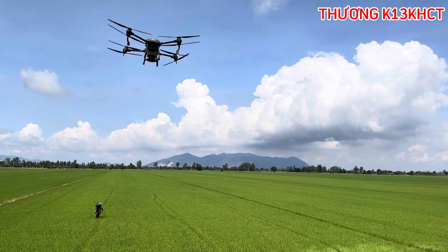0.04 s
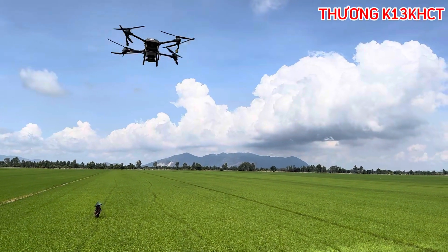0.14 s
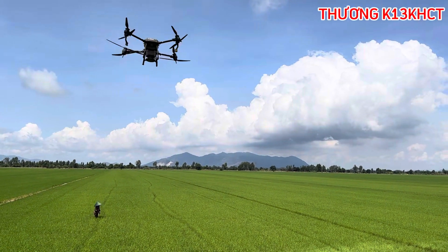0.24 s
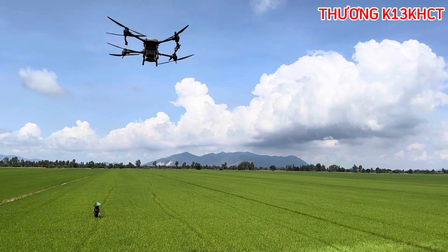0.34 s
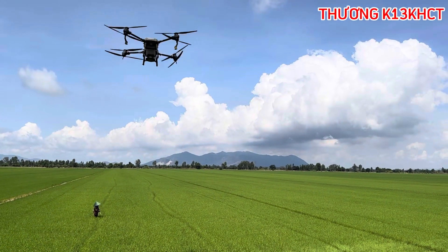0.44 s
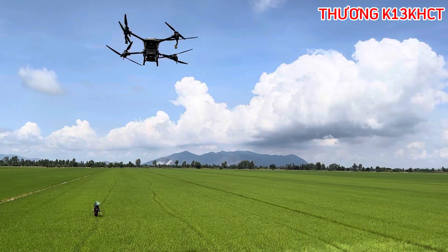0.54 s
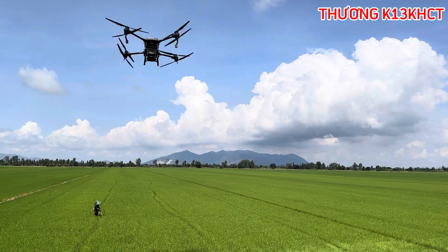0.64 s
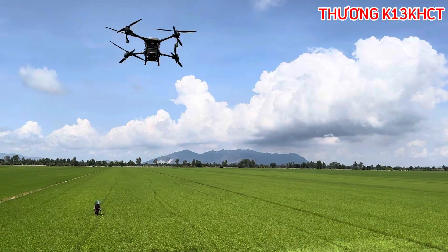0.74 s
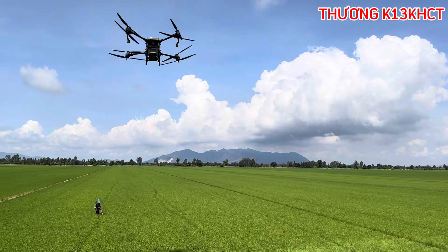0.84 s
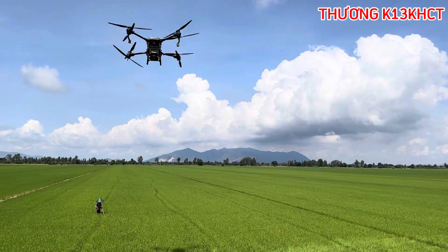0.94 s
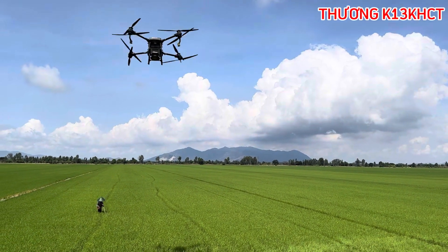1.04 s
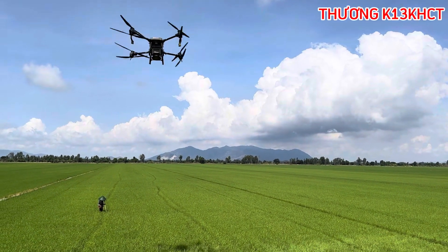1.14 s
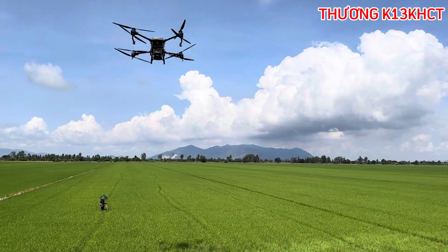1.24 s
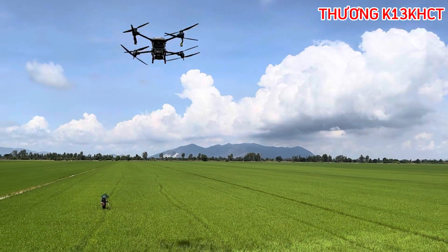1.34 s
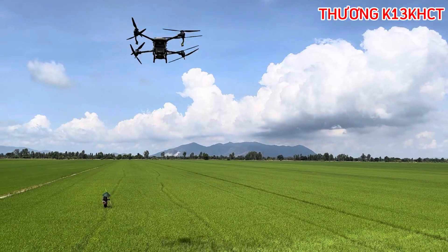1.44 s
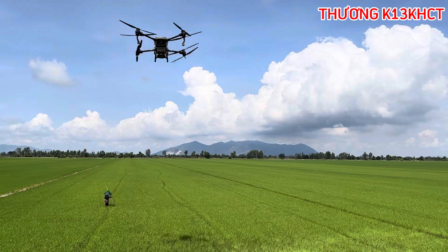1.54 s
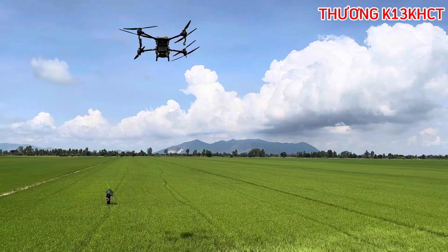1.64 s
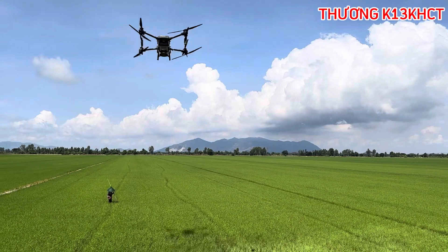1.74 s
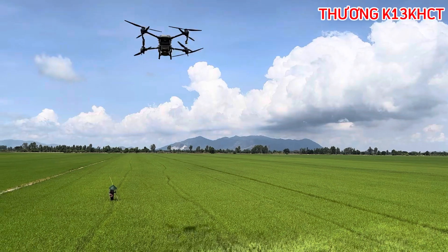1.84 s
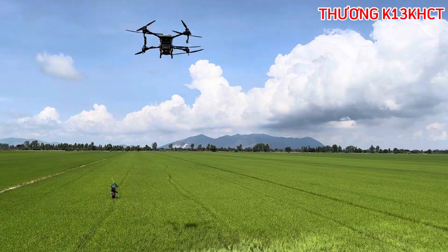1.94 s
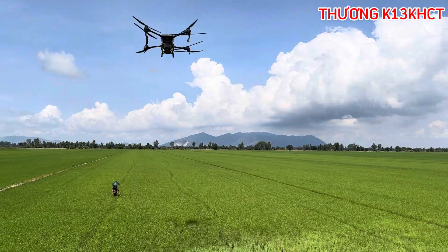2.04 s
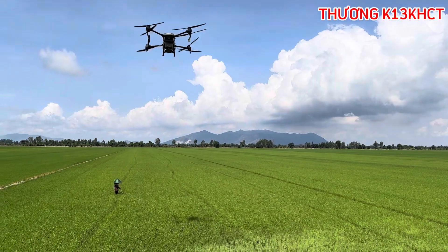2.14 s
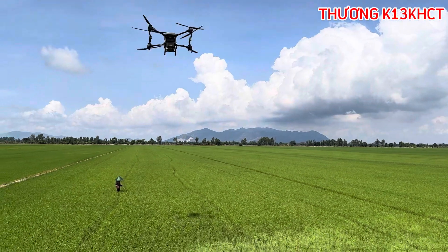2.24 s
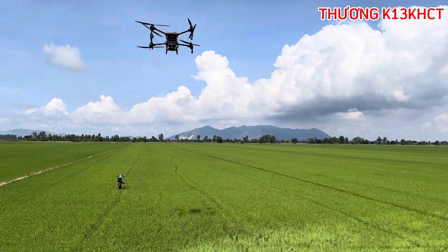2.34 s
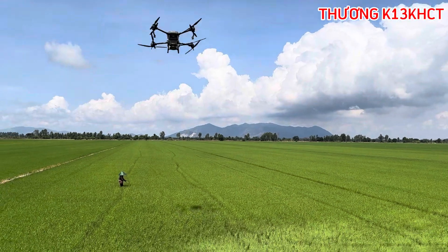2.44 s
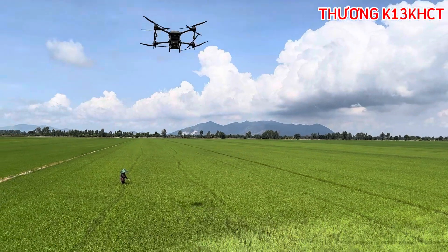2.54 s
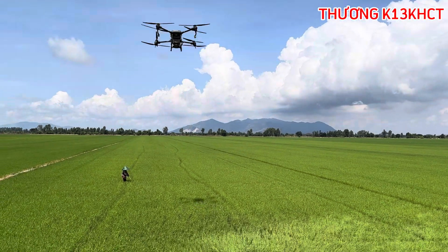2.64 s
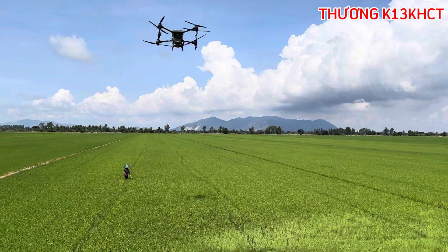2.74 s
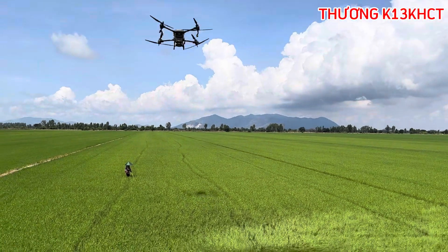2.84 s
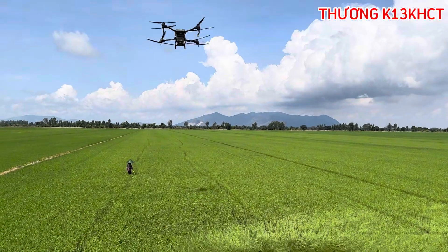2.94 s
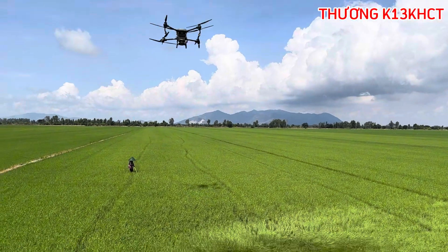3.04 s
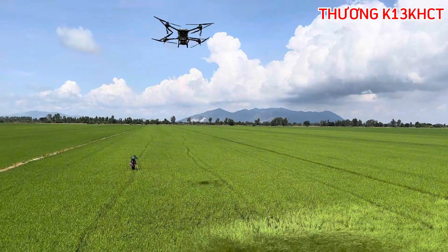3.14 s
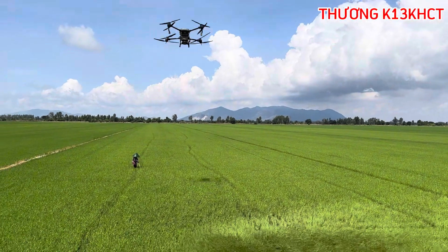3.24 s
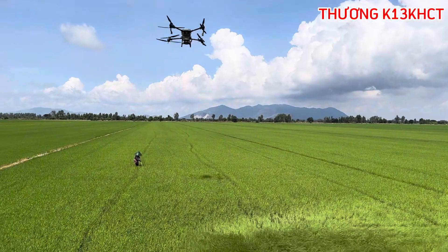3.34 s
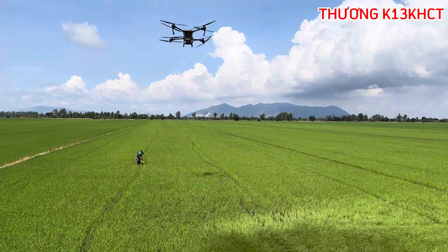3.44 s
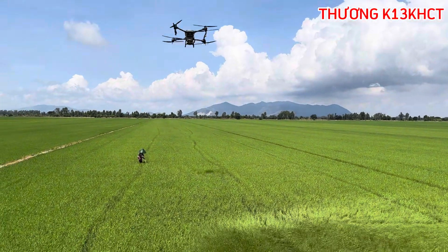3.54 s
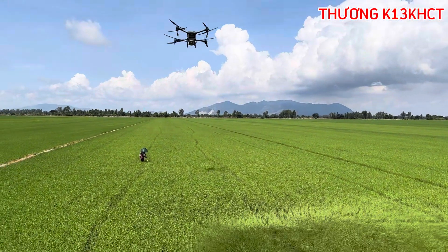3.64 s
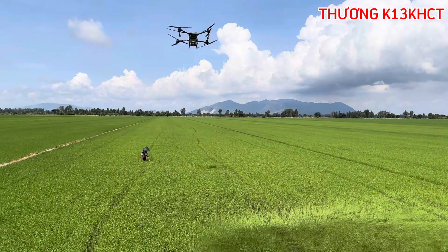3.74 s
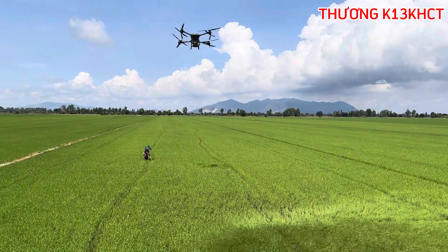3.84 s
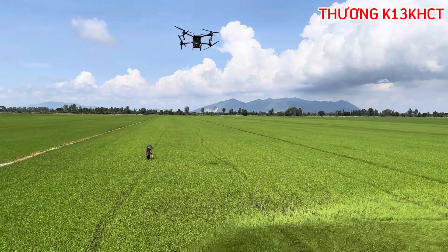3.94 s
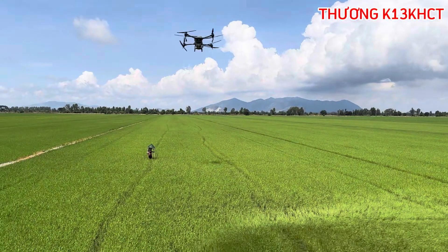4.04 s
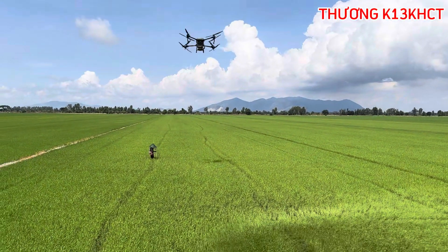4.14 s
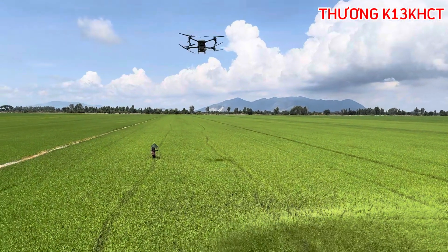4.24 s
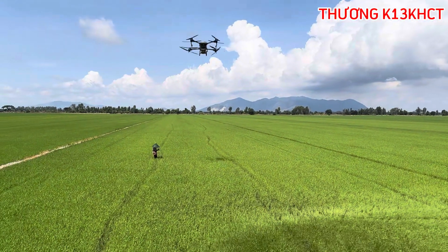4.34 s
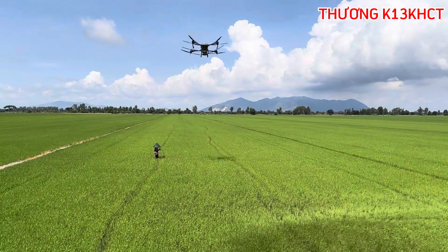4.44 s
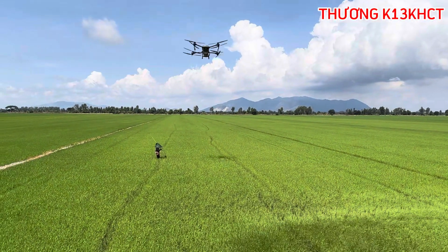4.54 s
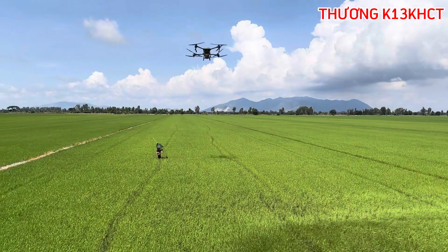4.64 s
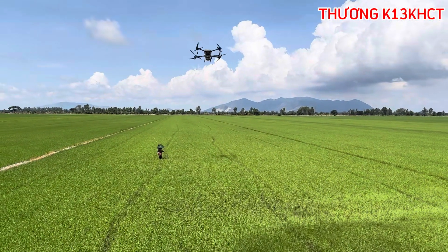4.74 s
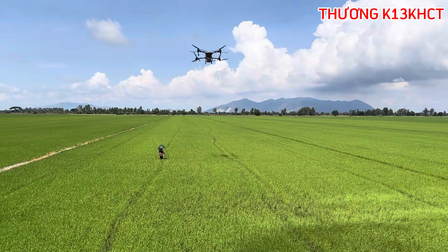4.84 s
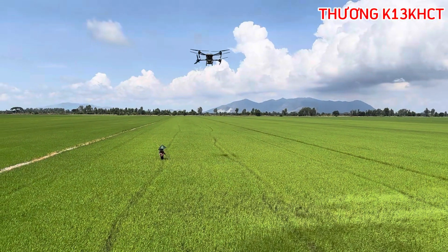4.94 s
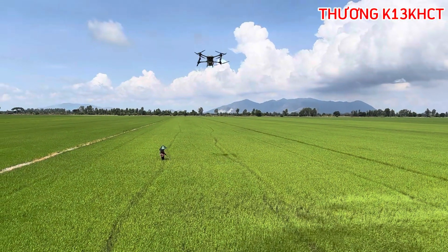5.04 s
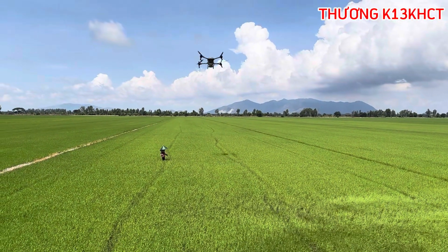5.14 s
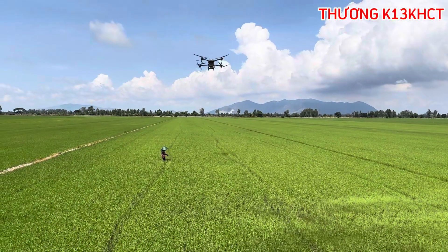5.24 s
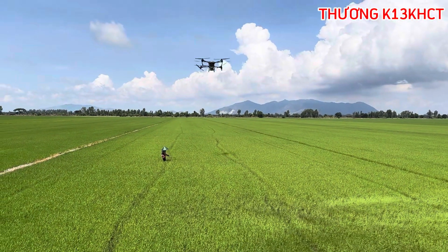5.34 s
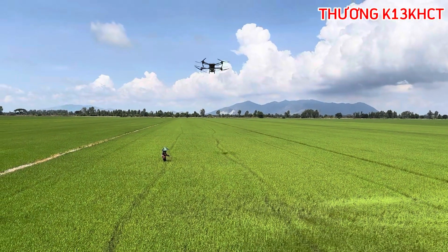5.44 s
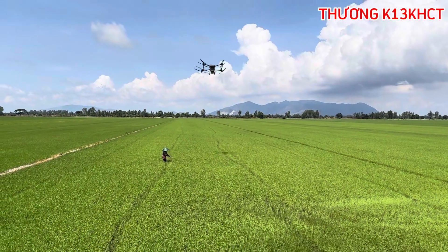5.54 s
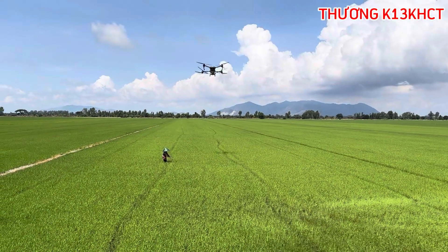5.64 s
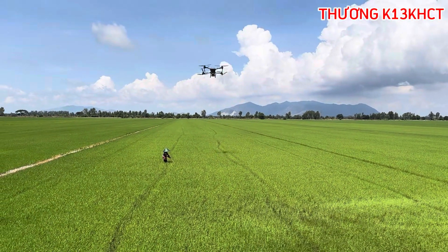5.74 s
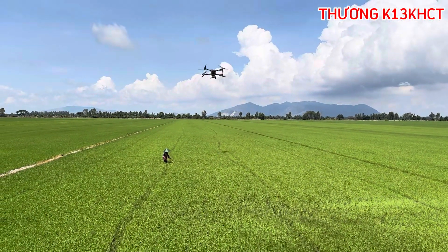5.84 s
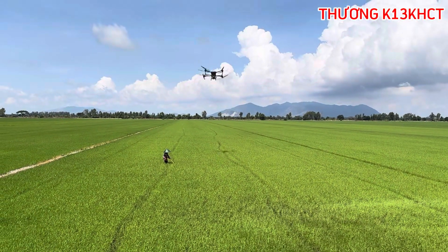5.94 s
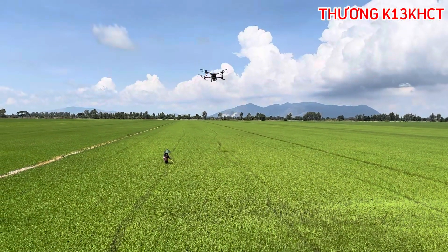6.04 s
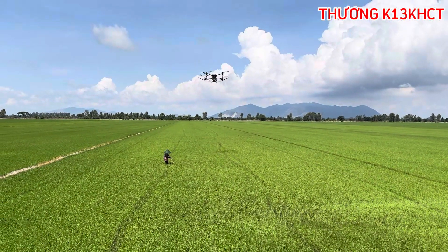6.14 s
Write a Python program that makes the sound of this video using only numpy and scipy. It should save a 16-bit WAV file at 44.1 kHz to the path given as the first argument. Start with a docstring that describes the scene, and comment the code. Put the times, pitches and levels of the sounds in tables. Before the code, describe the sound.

A large four-rotor spraying drone buzzes and whooshes overhead, then recedes across an open field, with hissing mist, a steady engine hum and wind rumble.

```python
"""Spraying drone over a rice field

A four-rotor drone flies low over a flooded field and draws away: each rotor hums at its own speed,
and its blades chop a rush of air. The field sends back a late copy that sweeps the colour.
Spray hisses in step with the rotors, and a faint ringing sizzle flares up once.
A small engine (likely a generator) runs steadily nearby, and gusts rumble on the microphone."""
import sys
import numpy as np
from scipy import signal
from scipy.fft import rfft, irfft, next_fast_len
from scipy.io import wavfile
from scipy.ndimage import uniform_filter1d, map_coordinates

SR = 44100
rng = np.random.default_rng(int(sys.argv[2]) if len(sys.argv) > 2 else 0)


def persist_wave(psi):
    """Save psi, clipped to +-1, as 16-bit WAV."""
    counts = np.round(np.clip(psi, -1, 1) * 32767).astype(np.int16)
    wavfile.write(sys.argv[1], SR, np.atleast_2d(counts).T)


N = 272979
T = np.arange(N) / SR  # time of each sample [s]

# share of each rotor in the overtones and the chopping: (level [dB]), one entry per rotor
ROTOR_DB = [-4, -9, -7, -11.5]
# colour of the air rushing over the blades: (frequency [Hz], level [dB per Hz])
RUSH = [(40, -19), (110, 7.5), (210, 0.5), (270, -10), (330, 1.5), (430, -1), (620, 2), (1000, -0.5),
        (1450, -0.5), (1750, -4.5), (2400, -7.5), (4000, -13), (7000, -21), (10000, -73)]
# centres of the bands that flicker separately in the rush: (frequency [Hz])
RUSH_BANDS_HZ = [125, 250, 500, 1000, 2000, 4000, 8000]
# gusts in the rotor wash, before their own colour: (time [s], length [s], louder by [dB])
WASH_GUSTS = [(0.58, 0.078, 4), (0.96, 0.058, 1), (1.14, 0.022, 3), (1.95, 0.034, 3), (3.82, 0.025, 4),
              (4.85, 0.025, 3.5), (5.035, 0.024, 2)]
# hiss off the back edges of the blades: (frequency [Hz], level against the rush [dB])
EDGE_HISS = [(700, -40), (1600, -18), (2600, -14.5), (3800, -15), (7000, -34)]
EDGE_BEAM = 5.4  # a higher power makes the downward beam narrower


def drone(turns, rush_db, chop=0.3, sharp=6.8, lopsided=0.28):
    """Rotor tones and air noise that pulses with each blade, heard directly and off the field."""
    weights = np.sqrt(undb(ROTOR_DB))
    blades = np.average([swish(2 * turn, sharp) for turn in turns], axis=0, weights=weights)
    # the two blades of a rotor differ, so the rush also throbs once a turn
    power = (1 - chop + chop * blades) * swish(turns[0], lopsided)
    rush = eddies(air(RUSH), RUSH_BANDS_HZ, depth_db=1.75, rate=30)
    rush = rush * np.sqrt(power) * undb(rush_db)
    # gusts swell the middle of the rush
    gust_colour = [(200, -28), (450, -2.5), (1500, -5.5), (3000, -15)]
    gusts = colour(rush, gust_colour) * (undb(louder_db(WASH_GUSTS)) - 1)
    edge = colour(rush, EDGE_HISS) * (1 - glancing()) ** EDGE_BEAM
    direct = rush + gusts + edge + rotor_tones(turns, rush_db) + imbalance_throb(turns[0])
    return direct + field_echo(direct)


# how often blades pass on each rotor; the rates start far apart and draw closer as the drone leaves:
# (time [s], rotor 1 [Hz], rotor 2 [Hz], rotor 3 [Hz], rotor 4 [Hz])
ROTOR_HZ = [(0, 95.1, 106.5, 77.8, 95.3), (0.349, 94.76, 103.8, 81.4, 93.7), (0.7, 94.2, 107.5, 85.2, 94.4),
            (1.0, 94.9, 108, 84, 95.83), (1.3, 95.87, 103.9, 83.18, 93.97), (1.75, 95.4, 97.5, 81.35, 93.4),
            (2.7, 94.95, 96.65, 80, 92), (3.5, 93.8, 94.6, 79.57, 92.1), (4.2, 94, 93.5, 81.74, 92.3),
            (6.19, 93.97, 95.5, 81.44, 93)]


def shafts(wobble=0.003056):
    """Turns made by each two-bladed rotor: half its blade rate, with a small random wobble."""
    return [rng.random() + np.cumsum(hz / 2 * (1 + wobble * walk(7))) / SR for hz in curves(ROTOR_HZ)]


# curve of overtone strength against the rush, read at each whole multiple from 4 to 24:
# (multiple of the shaft rate, level for the loudest rotor [dB], level for the other three [dB])
ROTOR_TONES = [(3.95, -4, -4), (5, -15, -15.5), (6, -10, -12), (7, -12.5, -14.5), (8, -12, -13.5),
               (9, -11.5, -15), (10, -11, -18.5), (11, -13, -19), (12, -11, -15.5), (13, -12, -30),
               (14, -21, -18), (15, -16, -26), (17, -17, -20), (20.2, -12.5, -10), (22, -15.5, -26),
               (22.6, -9, -28), (23.9, -27, -14.5)]
# peak level of each rotor's blade hum:
# (time [s], rotor 1 [dB], rotor 2 [dB], rotor 3 [dB], rotor 4 [dB])
HUM = [(0, -24, -29, -25, -23), (0.3, -34, -31, -32, -39), (0.65, -35, -31, -21.5, -29),
       (0.9, -20.5, -30, -35, -34), (1.2, -22.5, -28.5, -39, -37), (1.45, -32.5, -42, -41, -47),
       (2.2, -26.5, -44, -36, -31), (3.1, -28, -39, -34, -38), (3.8, -41, -39, -36, -42),
       (4.4, -35, -45, -40, -46), (6.19, -35, -49, -42, -48)]
# blades slap through their own wake while the drone tilts: (time [s], overtones louder by [dB])
SLAP = [(0, -2), (0.45, 0), (0.75, 2.5), (1.15, 3), (1.6, 0), (2.0, -1), (3.0, -1), (6.19, -4)]
# a faster rotor has louder overtones: blade rate in a hover, gain for each Hz above it
HOVER_HZ, LOAD_DB_PER_HZ = 98.1, 0.3


def rotor_tones(turns, rush_db, flutter=0.67, flutter_hz=4.03):
    """Each rotor's blade hum swells and fades by its own curve; fluttering overtones follow the rush."""
    multiple, loudest, others = np.transpose(ROTOR_TONES)
    overtone_db = rush_db + curves(SLAP)[0]
    strengths = (loudest, others, others, others)
    out = np.zeros(N)
    rotors = zip(turns, curves(ROTOR_HZ), curves(HUM), ROTOR_DB, strengths)
    for turn, hz, hum_db, share_db, tones_db in rotors:
        out += undb(hum_db) * shaft_tone(turn, 2)
        size = undb(overtone_db + share_db + LOAD_DB_PER_HZ * (hz - HOVER_HZ))
        # blades cutting eddies make the overtones flutter
        for k in np.arange(4, 25):
            strength = size * undb(np.interp(k, multiple, tones_db))
            out += strength * (1 + flutter * walk(flutter_hz)) * shaft_tone(turn, k)
    return out


def shaft_tone(turn, k):
    """A pure tone that swings k times per turn of a shaft, from a random starting point."""
    return np.cos(2 * np.pi * (k * turn + rng.random()))


# throb of an unbalanced rotor, before its flutter:
# (multiple of the shaft rate, peak level overhead [dB], peak level at a glancing angle [dB])
IMBALANCE = [(1, -40, -35), (3, -25.5, -41)]


def imbalance_throb(turn, flutter=0.25):
    """An unbalanced rotor throbs at odd multiples of its shaft rate."""
    out = np.zeros(N)
    for k, overhead_db, glancing_db in IMBALANCE:
        level_db = overhead_db + (glancing_db - overhead_db) * glancing()
        out += undb(level_db) * (1 + flutter * walk(2.73)) * shaft_tone(turn, k)
    return out


# what the flooded field mirrors at any angle, mostly bass: (frequency [Hz], level [dB])
MIRROR_BASS = [(150, -9.5), (260, -17.5), (400, -21), (800, -50)]
# what it mirrors best at a glancing angle: (frequency [Hz], level [dB])
MIRROR_GLANCING = [(130, -33), (280, 6), (420, -1.5), (600, -0.5), (900, -10), (1500, -5), (6000, -7)]


def field_echo(direct, overhead_share=0.11):
    """Late copy off the field: the crop swallows steep sound and mirrors flatter sound better."""
    copy = late(direct, ground_ms())
    share = overhead_share + (1 - overhead_share) * glancing()
    return colour(copy, MIRROR_BASS) + share * colour(copy, MIRROR_GLANCING)


# level, straight flight that gathers speed; the speed is the one overhead
HEIGHT_M, MIC_HEIGHT_M, SPEED_M_S, SPEEDUP_M_S2, OVERHEAD_S = 5.96, 1.93, 1.617, 0.21, 0.13
SOUND_M_S = 343  # speed of sound


def along(behind_m=0):
    """Metres flown past the microphone by a point this far behind the drone."""
    since = T - OVERHEAD_S
    return SPEED_M_S * since + SPEEDUP_M_S2 * since ** 2 / 2 - behind_m


def path(height_m, behind_m=0):
    """Straight-line metres to a point that moves with the drone, for a given height difference."""
    return np.hypot(along(behind_m), height_m)


def remoteness(behind_m=0):
    """Tenfold steps of distance: 0 overhead, 1 at ten times as far."""
    above = HEIGHT_M - MIC_HEIGHT_M
    return np.log10(path(above, behind_m) / above)


def ground_ms():
    """How late the copy off the field arrives; the detour shrinks as the drone draws away."""
    detour_m = path(HEIGHT_M + MIC_HEIGHT_M) - path(HEIGHT_M - MIC_HEIGHT_M)
    return 1000 * detour_m / SOUND_M_S


def glancing():
    """How flat the sound travels: 0 with the drone overhead, 1 with it on the horizon."""
    return (along() / path(HEIGHT_M)) ** 2


# colour of the coarse hiss: (frequency [Hz], level [dB per Hz])
SPRAY = [(800, -39), (2500, -9), (3700, 7), (4700, 4), (5600, 6), (7000, -2.5), (8000, -0.5), (9500, -94),
         (12000, -43)]
# colour of the fine hiss of the mist: (frequency [Hz], level [dB per Hz])
MIST = [(5000, -36), (7200, -5.5), (8300, 0.5), (9700, -1.5), (11000, 2.5), (12700, 0.5), (14200, 4),
        (15700, 1)]
# centres of the bands that flicker separately in the mist: (frequency [Hz])
MIST_BANDS_HZ = [9000, 12000, 15000]
# spurts of spray: (time [s], louder by [dB], length [s])
SPURTS = [(0.08, 1.5, 0.11), (1.943, 2, 0.22), (2.878, 2, 0.049), (3.848, 1.5, 0.064), (4.04, 0.5, 0.047),
          (5.91, 2, 0.083)]
# bursts of thrust, shared with the rush of air: (time [s], length [s], rush louder by [dB])
THRUSTS = [(0.95, 0.72, 0.5), (3.52, 0.35, 3), (4.45, 0.5, 2)]
TRAIL_M = 1.8  # the spray trails this far behind the drone
# level straight overhead, and fall for ten times the distance
COARSE_DB, COARSE_FALL_DB = -39.5, 8
FINE_DB, FINE_FALL_DB = -32.5, 18.5


def spray(turns, thrust_share=0.27, flicker_db=1.0, mist_flicker_db=2.65, in_step_hz=11050, turn_hz=4400):
    """Droplets torn up in the rotor wash hiss in step with the shafts."""
    far = remoteness(TRAIL_M)
    spurt_db = sum(db * swell(s, length) for s, db, length in SPURTS)
    coarse_db = COARSE_DB - COARSE_FALL_DB * far + spurt_db + thrust_share * louder_db(THRUSTS)
    fine_db = FINE_DB - FINE_FALL_DB * far + spurt_db
    power = swish(turns[0], sharp=0.093) * swish(turns[1], sharp=0.14) * swish(2 * turns[0], sharp=0.17)
    coarse = air(SPRAY) * undb(coarse_db + flicker_db * flicker(32))
    # the finest hiss is one wave in both ears, out of step by a phase that turns with frequency
    size = next_fast_len(N)
    phase = np.pi * (np.arange(size // 2 + 1) * SR / size - in_step_hz) / turn_hz
    ear_phases = np.exp(1j * np.array([phase, -phase]))
    pair = irfft(rfft(rng.standard_normal(size)) * ear_phases, size)[:, :N]
    mist = eddies(colour(pair, MIST), MIST_BANDS_HZ, mist_flicker_db, rate=36)
    fine = unit(mist) * undb(fine_db)
    return (coarse + fine) * np.sqrt(power)


# ringing spots of the sizzle, before each mix is scaled to its overall level:
# (frequency [Hz], width [Hz], level at rest [dB], level in the flare [dB])
SIZZLE_MODES = [(2080, 140, 3, -9), (3110, 170, 2.5, -2), (3850, 260, -7, 2), (4585, 150, -1, 0),
                (5440, 450, -13, -16), (6660, 300, -7.5, -8), (7250, 900, -18, -12)]
SIZZLE_S, SIZZLE_RISE_S, SIZZLE_FALL_S = 4.465, 0.095, 0.035  # peak time, rise and fall of the flare
SIZZLE_REST_DB, SIZZLE_FLARE_DB = -43, -36.5


def sizzle(waver_db=2.0):
    """Faint, patchy hiss in narrow resonances that flares up once, brighter, and drops back quickly."""
    noise = air([(1000, 0), (8000, 0)])
    noise = colour(noise, [(800, -26), (1800, -4.5), (7300, 2.5), (9500, -33)])
    rest, flare = 0, 0
    for hz, width, rest_db, flare_db in SIZZLE_MODES:
        ring = signal.lfilter(*signal.iirpeak(hz, hz / width, fs=SR), noise)
        rest = rest + undb(rest_db + waver_db * walk(8)) * ring
        flare = flare + undb(flare_db) * ring
    flare_level = undb(SIZZLE_FLARE_DB) * swell(SIZZLE_S, SIZZLE_RISE_S, SIZZLE_FALL_S)
    return undb(SIZZLE_REST_DB) * unit(rest) + flare_level * unit(flare)


ENGINE_HZ = 85.92  # average firing rate
# engine tones, before they waver: (multiple of the firing rate, level [dB rms])
ENGINE_TONES = [(1, -30), (2, -24), (3, -34.5), (4, -36), (5, -53.5), (6, -55.5), (7, -53), (8, -48.5),
                (12, -48)]
# colour of the engine's rasp: (frequency [Hz], level [dB per Hz])
RASP = [(60, 3), (150, -2.5), (330, 15.5), (420, 5), (540, 4), (700, 8), (1050, 2.5), (1600, -2),
        (2100, -3.5), (2700, -31), (3100, -10.5), (4000, -18), (8000, -14.5), (12000, -94)]


def engine(waver_db=0.87, rasp_db=-37, bounce=0.62, bounce_ms=0.96):
    """A steady engine: clean exhaust tones and a rasp coloured by a bounce off a surface close by."""
    cycles = np.cumsum(ENGINE_HZ * (1 + 0.00089 * walk(5.5))) / SR
    tones = np.zeros(N)
    for k, db in ENGINE_TONES:
        # moving air makes the weaker tones waver most
        waver = waver_db * walk(2.57) * (0.35 if k <= 2 else 1.5)
        tones += np.sqrt(2) * undb(db + waver) * np.cos(2 * np.pi * (k * cycles + rng.random()))
    rasp = air(RASP) * np.sqrt(swish(cycles, sharp=0.47))
    return tones + undb(rasp_db) * unit(rasp + bounce * late(rasp, bounce_ms))


# colour of the wind rumble: (frequency [Hz], level [dB per Hz])
WIND = [(15, -36), (28, -17), (48, 7), (70, 9.5), (110, 7), (180, 4), (300, -10.5), (700, -23), (3000, -80)]
# strength of the breeze, with one lull, before the gain and gusts below: (time [s], level [dB])
BREEZE = [(0, -29.5), (1.2, -33.5), (1.7, -44), (2.4, -39), (3.2, -34), (4.2, -34), (5.0, -31.5),
          (6.19, -32)]
# single harder buffets, added to the breeze: (time [s], level [dB], length [s])
BUFFETS = [(0.154, -27, 0.025), (0.945, -32, 0.025), (1.348, -33, 0.051), (3.258, -32, 0.025),
           (5.453, -29, 0.019), (6.099, -43, 0.043)]
# eddies that strike with a round thump: (time [s], peak level [dB], length [s], frequency [Hz])
THUMPS = [(0.153, -17, 0.0079, 85), (5.473, -16, 0.0087, 138), (5.478, -14.5, 0.015, 67.5),
          (5.686, -21, 0.02, 69.5)]


def wind(gain_db=3.0, gust_db=0.5):
    """Low rumble of a gusty breeze on the microphone, with a few harder buffets and thumps."""
    strength = undb(curves(BREEZE)[0] + gain_db + gust_db * walk(3.1))
    buffets = sum(undb(db) * swell(s, length) for s, db, length in BUFFETS)
    out = air(WIND) * (strength + buffets)
    for s, db, length, hz in THUMPS:
        out = out + undb(db) * swell(s, length) * np.sin(2 * np.pi * (hz * T + rng.random()))
    return out


# how wide noise sounds at each pitch: (frequency [Hz], side minus mid level [dB])
WIDTH = [(30, -5), (70, -9), (180, -3), (280, -5), (400, -10.5), (700, -7.5), (1300, -7), (1800, -5),
         (2400, -5.5), (4400, -8), (6000, -2), (8000, -3.5)]


def air(points):
    """Stereo noise of a given colour; how much the ears differ depends on pitch."""
    mid, side = rng.standard_normal((2, N))
    side = colour(side, WIDTH)
    pair = colour(np.array([mid + side, mid - side]), points)
    return pair / np.std(pair.mean(axis=0))


def eddies(x, centres, depth_db, rate):
    """Turbulent air makes each band of a sound flicker by itself."""
    size = next_fast_len(N)
    log_hz = np.log(np.maximum(np.arange(size // 2 + 1) * SR / size, 1))
    spectrum = rfft(x, size)
    out = 0
    for band in np.eye(len(centres)):
        part = irfft(spectrum * np.interp(log_hz, np.log(centres), band), size)[:, :N]
        out = out + part * undb(depth_db * flicker(rate))
    return out


def swish(turns, sharp):
    """A smooth burst of power once a cycle, mean 1."""
    burst = np.exp(sharp * np.cos(2 * np.pi * turns))
    return burst / burst.mean()


def swell(s, length, fall=None):
    """A smooth rise and fall around a moment, top 1; the fall may have its own length."""
    width = length if fall is None else np.where(T < s, length, fall)
    return np.exp(-((T - s) / width) ** 2)


def louder_db(table):
    """Extra loudness from a table of passing swells."""
    return sum(db * swell(s, length) for s, length, db in table)


def walk(rate):
    """Smooth random wander through about rate random points a second, spread near 1."""
    knots = rng.standard_normal(512)
    smooth = map_coordinates(knots, [np.arange(2048) / 4], mode="wrap")
    return np.interp(T, np.arange(2048) / (4 * rate), smooth)


def flicker(rate, drift_s=0.047):
    """Quick random wander with its slow drift taken out."""
    w = walk(rate)
    return w - uniform_filter1d(w, max(int(drift_s * SR), 2))


def late(x, ms):
    """A stereo sound delayed by a fixed or moving time."""
    return np.array([np.interp(T - ms / 1000, T, channel) for channel in x])


def colour(x, points):
    """Filter by a (frequency [Hz], level [dB]) curve."""
    hz, db = np.transpose(points)
    size = next_fast_len(N)
    f = np.maximum(np.arange(size // 2 + 1) * SR / size, 1)
    gain = undb(np.interp(np.log(f), np.log(hz), db))
    return irfft(rfft(x, size) * gain, size)[..., :N]


def curves(table):
    """Each column of a time table, sample by sample."""
    s, *columns = np.transpose(table)
    return [np.interp(T, s, c) for c in columns]


def undb(db):
    """Decibels to gain."""
    return 10 ** (np.asarray(db) / 20)


def unit(x):
    """Scale to rms 1."""
    return x / np.sqrt(np.mean(x ** 2))


RUSH_DB, RUSH_FALL_DB = -25, 19  # rush level overhead, and fall for ten times the distance


def scene():
    """The drone and its spray over the sizzle, the engine and the wind."""
    turns = shafts()
    rush_db = RUSH_DB - RUSH_FALL_DB * remoteness() + louder_db(THRUSTS)
    return drone(turns, rush_db) + spray(turns) + sizzle() + engine() + wind()


# lean of the microphone pair: (frequency [Hz], left minus right level [dB])
LEAN = [(60, 0.5), (170, -1), (700, -0.3), (1550, -2), (2200, 2), (3200, -1), (4700, -1), (5900, -3.5),
        (6900, -3.5), (7900, 1), (8400, -0.5)]
TOP_HZ = 15850  # nothing much is left above this


def record(dry):
    """Each port of the microphone pair has its own colour; a steep low-pass cuts the top."""
    leaned = []
    for channel, sign in zip(dry, (1, -1)):
        leaned.append(colour(channel, [(hz, sign * db / 2) for hz, db in LEAN]))
    low_pass = signal.ellip(14, 0.2, 80, TOP_HZ, fs=SR, output="sos")
    return signal.sosfilt(low_pass, np.array(leaned))


dry = scene()
out = record(dry)
persist_wave(out)
```